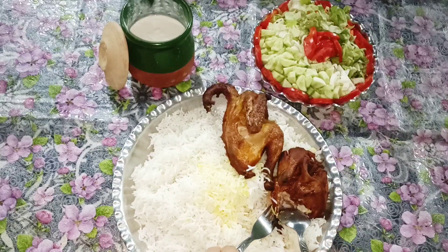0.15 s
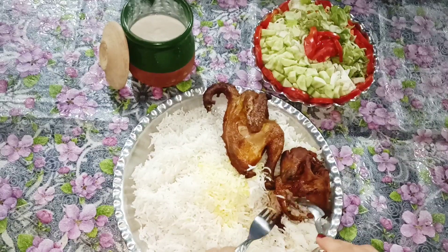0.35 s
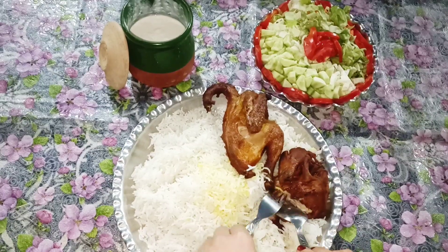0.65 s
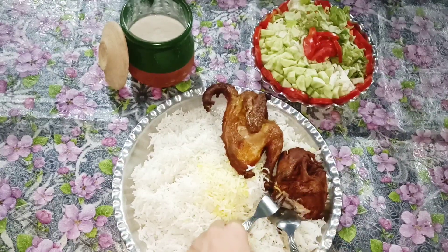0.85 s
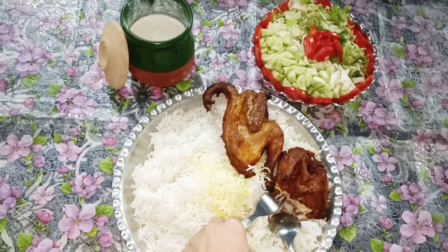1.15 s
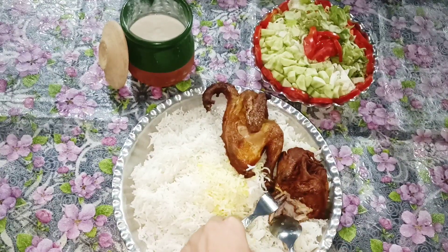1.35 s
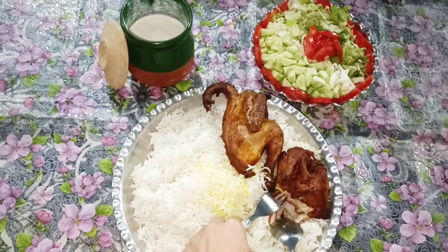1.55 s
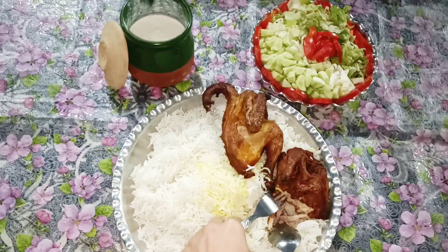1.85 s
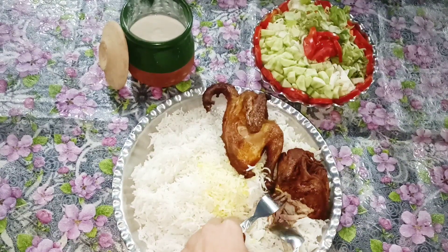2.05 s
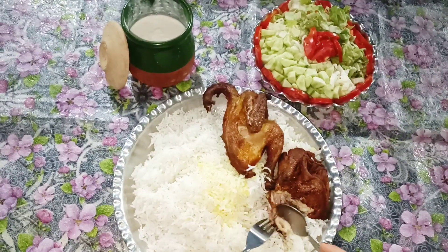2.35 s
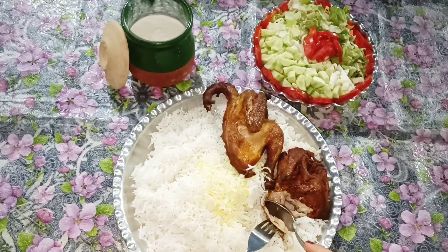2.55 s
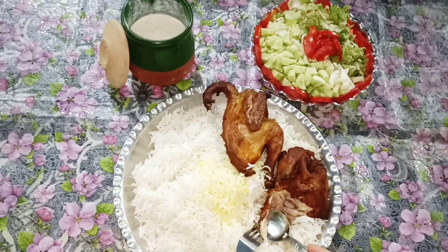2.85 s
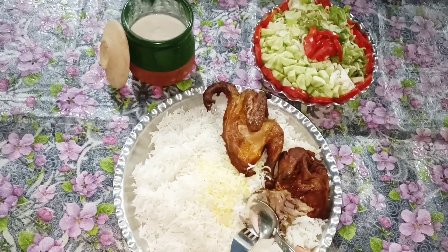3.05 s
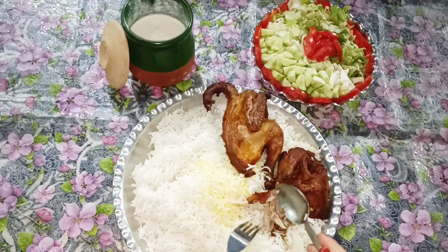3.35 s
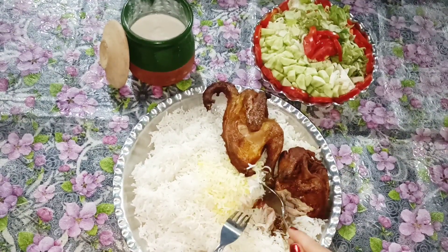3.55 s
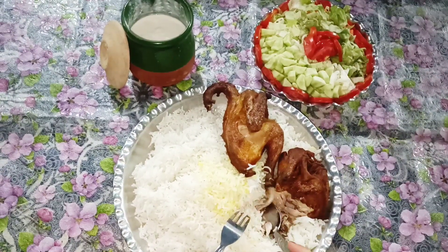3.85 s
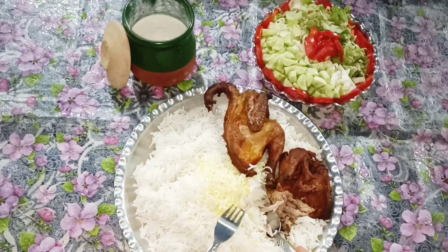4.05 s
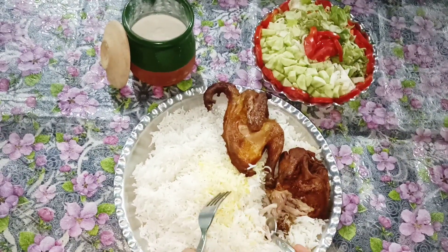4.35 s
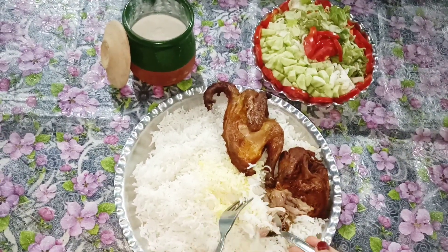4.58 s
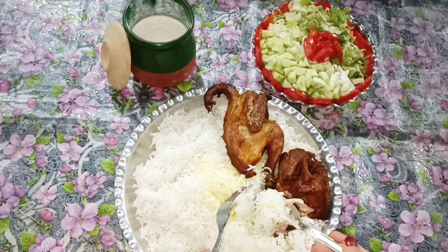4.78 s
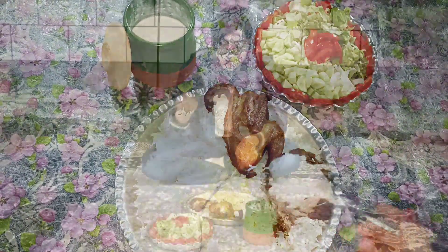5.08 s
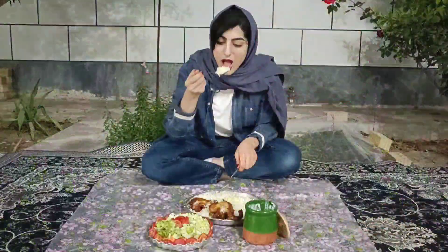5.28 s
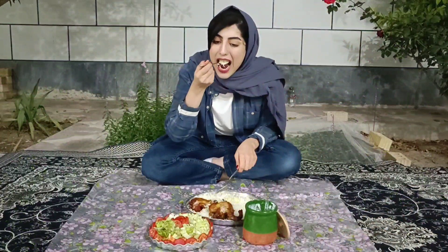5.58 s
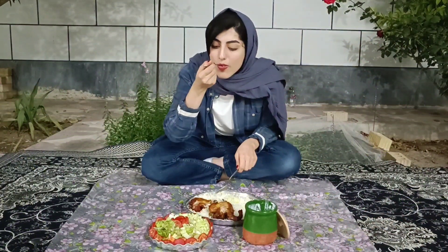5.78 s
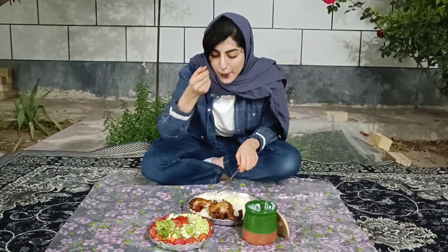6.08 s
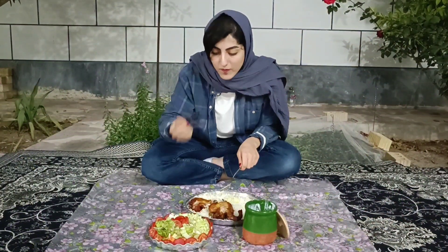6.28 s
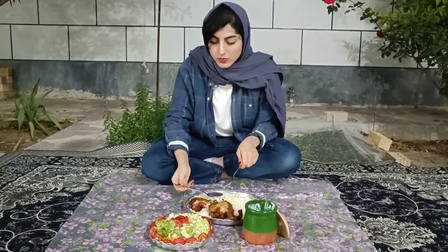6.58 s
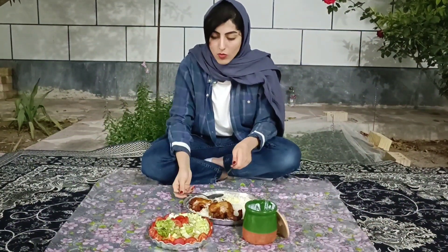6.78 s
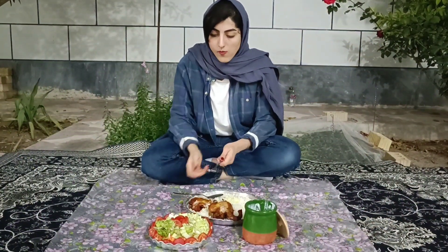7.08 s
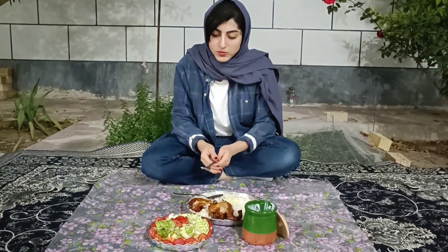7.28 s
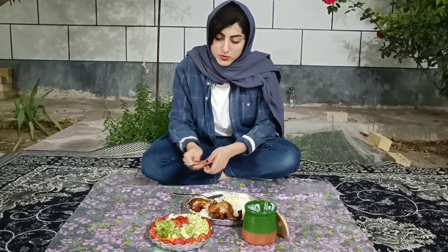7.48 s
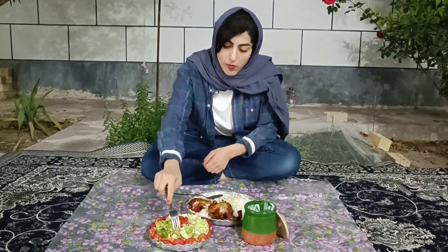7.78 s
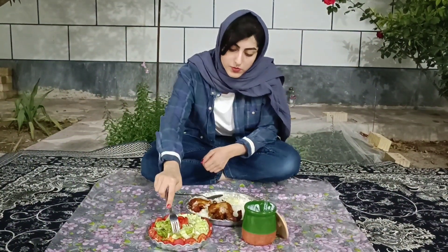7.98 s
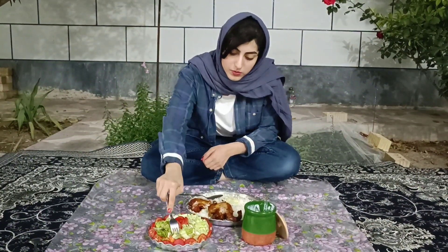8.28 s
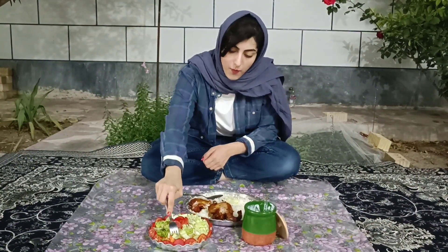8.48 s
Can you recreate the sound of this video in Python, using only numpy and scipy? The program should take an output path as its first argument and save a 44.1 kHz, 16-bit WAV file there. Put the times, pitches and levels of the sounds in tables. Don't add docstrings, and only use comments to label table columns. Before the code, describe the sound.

In a quiet walled garden with faint traffic rumble, a fork and spoon tick and scrape softly on a metal tray of rice, heard close. Distant hoarse birds chatter and a cricket trills. At about five seconds the view moves back: the cricket is gone, the air thins, birds call loudly nearby, and cutlery clicks sparsely before a sharp metal clatter near seven seconds.

```python
import sys
import numpy as np
from scipy import signal
from scipy.fft import rfft, irfft, next_fast_len
from scipy.io import wavfile
from scipy.ndimage import uniform_filter1d, map_coordinates

SR = 44100
rng = np.random.default_rng(int(sys.argv[2]) if len(sys.argv) > 2 else 0)


def decibels_to_gain(level_db):
    exponent = np.asarray(level_db, float) / 20
    return 10 ** exponent


def materialize(psi):
    bounded = np.clip(np.atleast_2d(psi).T, -1, 1)
    quanta = np.round(bounded * 32767).astype(np.int16)
    wavfile.write(sys.argv[1], SR, quanta)


N = 380538


def unit(x):
    return x / np.sqrt(np.mean(x ** 2) + 1e-20)


def along(points, hz):
    f, v = np.transpose(points)
    return np.interp(np.log(hz + 1), np.log(f + 1), v)


def wobble(rate, size=N):
    knots = rng.standard_normal(int(size * rate / SR) + 4)
    return map_coordinates(knots, [np.arange(size) * rate / SR])


def filtered(x, response):
    m = next_fast_len(x.shape[-1] + 4096)
    spectrum = rfft(x, m) * response(np.fft.rfftfreq(m, 1 / SR))
    return irfft(spectrum, m)[..., :x.shape[-1]]


def resonances(peaks, bright_db):
    def response(f):
        tilt = decibels_to_gain(bright_db * np.log2(np.clip(f, 150, 16000) / 3000))
        total = 0
        for k, (hz, width, db) in enumerate(peaks):
            peak = 1j * f * width / (hz * hz - f * f + 1j * f * width)
            total = total + (-1) ** k * decibels_to_gain(db) * peak
        return tilt * total
    return response


def add(track, s, x):
    part = track[..., round(s * SR):][..., :x.shape[-1]]
    part += x[..., :part.shape[-1]]


# pitch_hz, t60_s
YARD_DECAY = [(500, 1), (2500, 0.77), (6000, 0.47), (12000, 0.44)]


def echoes(x, t60_scale, delay_s):
    size = 2048 if t60_scale < .25 else 16384
    hz, t, z = signal.stft(rng.standard_normal((2, size)), SR, nperseg=256)
    decay = decibels_to_gain(-60 * t / (t60_scale * along(YARD_DECAY, hz)[:, None]))
    tail = signal.istft(z * decay, SR, nperseg=256)[1]
    tail = np.pad(tail / np.linalg.norm(tail[0]), ((0, 0), (int(abs(delay_s) * SR), 0)))
    return signal.fftconvolve(np.atleast_2d(x), tail, axes=1)


# pitch_hz, likeness (-1 to 1)
AIR_LIKENESS = [(60, 0.74), (180, 0.64), (550, 0.29), (1650, -0.2), (4970, 0.019), (15000, -0.11)]


def air(spectrum, db, patchy_db, size):
    z = signal.stft(rng.standard_normal((2, size)), nperseg=512)[2]
    field = rng.standard_normal(z.shape[1:])
    field = uniform_filter1d(uniform_filter1d(field, 8, 0), 14, 1)
    pair = signal.istft(z * decibels_to_gain(patchy_db * unit(field)), nperseg=512)[1][:, :size]

    def colour(hz):
        turn = np.arccos(np.clip(along(AIR_LIKENESS, hz), -1, 1)) / 2
        return decibels_to_gain(along(spectrum, hz)) * [np.cos(turn), np.sin(turn)]

    mid, side = filtered(pair, colour)
    drift_db = .35 * wobble(1.5, size=size)
    return decibels_to_gain(db + drift_db) * unit(np.array([mid + side, mid - side]))


MOVE_S = 5.075
# pitch_hz, level_db per Hz
CLOSE_AIR = [(12, -40), (20, -19.5), (65, 0.5), (116, -2.5), (234, -8.5), (499, -15), (780, -16),
             (1530, -22), (3740, -26), (6010, -26.5), (6910, -30.5), (8650, -29.5), (9950, -33),
             (14700, -34), (16000, -32)]
# pitch_hz, level_db per Hz
BACK_AIR = [(12, -77), (20, -31), (52, -12.5), (130, -7), (241, -14.5), (270, -14), (301, -15),
            (718, -20.5), (825, -20), (976, -21.5), (2020, -28), (4180, -32), (6180, -37.5), (10200, -39),
            (16000, -40.5)]


def background():
    cut = round(MOVE_S * SR)
    before = air(CLOSE_AIR, db=-58.5, patchy_db=1.5, size=cut)
    after = air(BACK_AIR, db=-58.0, patchy_db=1.1, size=N - cut)
    return np.hstack([before, after])


# pitch_hz, level_db rms
ENGINES = [(68, -70), (82, -76.5), (128, -71.5), (150, -70)]


def engines():
    t = np.arange(N) / SR

    def slow(rate):
        knots = int(t[-1] * rate) + 2
        return np.interp(t * rate, np.arange(knots), rng.standard_normal(knots))

    out = np.zeros(N)
    for hz, db in ENGINES:
        level = decibels_to_gain(db + 2.5 + 3.5 * slow(9.8))
        pitch = hz * (1 + 0.03015 * slow(3))
        out += level * np.sin(2 * np.pi * np.cumsum(pitch) / SR)
    return out


# pitch_hz, level_db
THROAT = [(500, -50), (1000, -21), (1500, -13.5), (2150, -7), (2650, 2), (3700, 2.5), (4120, 0),
          (4750, 2.5), (5400, -0.5), (5900, -4.5), (6500, -6), (7200, -13), (9300, -18.5), (12500, -30.5),
          (16000, -68)]


def squawk(length_s, hz0, hz1, bright_db, rough, hoarse):
    u = np.linspace(0, 1, int(length_s * SR))
    pitch = (hz0 + (hz1 - hz0) * u ** 1.2) * (1 + rough * wobble(351.1, size=len(u)))
    phase = 2 * np.pi * np.cumsum(pitch) / SR
    k = np.arange(1, 10)[:, None]
    flutter = np.array([wobble(600 + 250 * min(j, 3), size=len(u)) for j in k[:, 0]])
    flutter = 0.57 + 1.4 * hoarse * flutter
    lean_db = (bright_db + 14 * (.45 - u)) * (np.minimum(k, 4) - 2.5)
    stack = unit(np.sum(decibels_to_gain(lean_db) * flutter * np.sin(k * phase), axis=0))
    breath = .75 * hoarse * rng.standard_normal(len(u))
    attack = np.clip(u / 0.2, 0, 1) ** 0.71
    release = np.clip((1 - u) / .5, 0, 1) ** 0.47
    voice = filtered(stack + breath, lambda hz: decibels_to_gain(along(THROAT, hz)))
    return unit(voice) * attack * release


def birds(calls, direct_db, early_db, yard_db, treble_db, hoarse, full_db, sag, bright_db, dulls):
    out = np.zeros((2, N))
    for s, length_s, db, hz0 in calls:
        effort_db = db - full_db
        hz1 = hz0 * (1 - np.clip(sag + 0.1 * effort_db, .12, sag))
        tilt_db = bright_db + np.clip(dulls * (effort_db - 5), -1.5, 0)
        call = decibels_to_gain(db) * squawk(length_s, hz0, hz1, tilt_db, rough=0.0329, hoarse=hoarse)
        call = filtered(call, lambda hz: decibels_to_gain(treble_db * np.log2(1 + hz / 6000)))
        add(out, s, decibels_to_gain(direct_db) * call * [[1], [0]])
        add(out, s + .0006, decibels_to_gain(direct_db) * call * [[0], [1]])
        add(out, s, decibels_to_gain(early_db) * echoes(call, t60_scale=0.064, delay_s=.002))
        add(out, s, decibels_to_gain(yard_db) * echoes(call, t60_scale=0.98, delay_s=0.01))
    return out


# start_s, level_db, pitch_hz at the start
FAR_CALLS = [(.04, -77, 1650), (.25, -66, 1610), (.75, -62, 1566), (1.15, -67, 1627), (1.929, -60, 1567),
             (2.18, -63, 1600), (2.53, -64, 1605), (3.27, -69.5, 1768), (3.459, -75, 1650),
             (3.84, -59, 1580), (4.03, -60, 1608), (4.14, -61.5, 1788)]


def far_birds():
    calls = [(s, .088, db, hz) for s, db, hz in FAR_CALLS]
    return birds(calls, direct_db=-5, early_db=-1.5, yard_db=0.5, treble_db=0, hoarse=0.6,
                 full_db=-62.5, sag=.195, bright_db=-1.5, dulls=0.071)


# pitch_hz, level_db, t60_s (not used, a smooth hump shapes each stroke)
WING = [(5890, 1, .012), (6340, -1, .015)]
# start_s, period_s, chirps
BOUTS = [
    (.095, .144, 3),
    (.507, .132, 11),
    (1.97, .1375, 17),
    (4.35, .167, 5),
]


def cricket():
    out = np.zeros((2, N))
    t = np.arange(int(0.016 * SR)) / SR
    for s in [first + k * period for first, period, chirps in BOUTS for k in range(chirps)]:
        size_db = -66 + 0.5 * rng.standard_normal()
        for k in range(3):
            stroke = np.zeros(len(t))
            for hz, db, t60 in WING:
                stroke += decibels_to_gain(db) * np.sin(2 * np.pi * hz * t + rng.uniform(0, 2 * np.pi))
            stroke = decibels_to_gain(size_db + 1.8 * (k - 3.5)) * stroke * np.hanning(len(t))
            add(out, s - .03 + .016 * k, echoes(stroke, t60_scale=0.091, delay_s=0))
    return out


# pitch_hz, width_hz, level_db
LOADED_TRAY = [(148, 98, -18.5), (400, 170, -7.5), (668, 270, -2.5), (1026, 116, 6.5), (1450, 300, -0.5),
               (1935, 120, 3.5), (2540, 98, 2), (2990, 85, 6.5), (3680, 750, 0), (5900, 1350, -2),
               (8700, 2100, -5.5), (14800, 1700, -13)]
# start_s, length_s, level_db, brightness_db per
SCRAPES = [(1.653, 0.036, -65.5, 0), (2.796, 0.097, -54, 2.5), (2.825, 0.0066, -45, -6.5),
           (2.948, 0.039, -66.5, 5), (3.042, 0.057, -64.5, 4), (3.138, 0.032, -68, 4.5),
           (3.33, 0.034, -68, 2), (3.877, 0.055, -49, -3.5), (3.975, 0.026, -52.5, -4),
           (3.988, 0.03, -51, -3.5), (2.831, 0.045, -55, -18), (4.889, 0.00386, -64.5, -10.5),
           (4.986, 0.0037, -67, -3)]


def scrapes():
    out = np.zeros((2, N))
    for s, length_s, db, bright_db in SCRAPES:
        n = int(length_s * SR)
        slips = decibels_to_gain(3.5 * wobble(450, size=n))
        grit = slips * (rng.standard_normal(n) + 1.1 * rng.standard_normal((2, n)))
        pressure = np.sin(np.pi * np.linspace(0, 1, n) ** 0.41)
        grit = np.pad(grit * pressure, ((0, 0), (0, 900)))
        stroke = decibels_to_gain(db) * unit(filtered(grit, resonances(LOADED_TRAY, bright_db)))
        add(out, s, stroke)
        add(out, s, decibels_to_gain(-14) * echoes(stroke, t60_scale=.45, delay_s=.004))
    return out


def ticks(touches, steel, tilt_db, contact_s, yard_db, tail):
    out = np.zeros((2, N))
    t = np.arange(1400) / SR
    u = t / np.clip(contact_s / 4, .0001, .003)
    for s, db, pan_db in touches:
        chatter = rng.standard_normal(len(t)) + 3.6 * rng.standard_normal((2, len(t)))
        tick = filtered(chatter * u * np.exp(-u), resonances(steel, tilt_db))
        tick = decibels_to_gain(db + 5.0) * tick / np.abs(tick).max(axis=1, keepdims=True)
        add(out, s, tick * decibels_to_gain(np.clip(pan_db, -6, 6) * np.array([[.5], [-.5]])))
        add(out, s, decibels_to_gain(yard_db) * echoes(tick, t60_scale=tail, delay_s=.004))
    return out


# pitch_hz, width_hz, level_db
TINES = [(2840, 810, -9), (3930, 330, 2), (5580, 710, 2), (7480, 380, 4), (8670, 450, 5),
         (11330, 670, -11.5), (11940, 280, -4), (14100, 2400, -16)]
# start_s, peak_db, left_right_db
TRAY_TICKS = [
    (1.7809, -53, -1.5),
    (2.0994, -55, -1.5),
    (2.1207, -50, -3),
    (2.7386, -45, 1.5),
    (2.7738, -54, 6),
    (2.7945, -41, 6),
    (2.9219, -54, -.5),
]


def tray_ticks():
    return ticks(TRAY_TICKS, TINES, tilt_db=-7, contact_s=0.0026, yard_db=-6, tail=.55)


# start_s, peak_db, left_right_db
SPOON_TICKS = [(1.7904, -52, 1), (1.7998, -42.5, 3), (1.8134, -56, 1), (1.821, -32.5, -4), (1.8246, -27, 1),
               (1.839, -43, -1.5), (1.9515, -46, 1), (2.0369, -51, -6), (2.1654, -54, 0), (2.8456, -37, -3),
               (3.7799, -56, -1), (3.8832, -46, -.5)]


def spoon_ticks():
    return ticks(SPOON_TICKS, TINES, tilt_db=6.5, contact_s=0.0034, yard_db=-14, tail=0.99)


# pitch_hz, width_hz, level_db
RIM = [(2700, 170, 2.5), (3670, 160, 3), (5750, 200, 4), (7500, 460, -15), (10000, 660, -5)]
# start_s, peak_db, left_right_db
CLINKS = [
    (3.0545, -48, 0),
    (3.1338, -57, 6),
    (3.142, -49, -2),
    (3.1514, -48, 5),
]


def rim_clinks():
    return ticks(CLINKS, RIM, tilt_db=0, contact_s=0.0074, yard_db=-16, tail=.55)


# start_s, length_s, level_db, pitch_hz at the start
NEAR_CALLS = [
    (5.072, 0.14, -51.5, 1442),
    (5.195, .15, -38.5, 1844),
    (5.375, 0.11, -35, 1850),
    (7.195, 0.14, -44.5, 1737),
    (7.355, .13, -35.5, 1854),
    (7.55, 0.15, -53, 1700),
    (7.66, 0.092, -51.5, 1644),
    (7.755, .05, -47, 1725),
    (8.135, 0.14, -40.5, 1747),
    (8.355, .14, -37.5, 1825),
]


def near_birds():
    return birds(NEAR_CALLS, direct_db=-14.0, early_db=-3.5, yard_db=-6, treble_db=4.0, hoarse=1.0,
                 full_db=-44.5, sag=.28, bright_db=-0.94, dulls=1.0)


# pitch_hz, width_hz, level_db
BOWL = [(2780, 420, 5.5), (4830, 770, 1), (7900, 820, 7), (11000, 1500, 1), (14000, 2500, -10)]
# start_s, peak_db, left_right_db
FAR_TICKS = [
    (5.3704, -44, 3),
    (5.703, -35, 6),
    (5.721, -57, 0),
    (5.7428, -49, -9),
    (5.8366, -46, -2),
    (6.3245, -45.5, 4),
    (6.329, -51.5, -2),
    (6.333, -58, 2),
    (8.0506, -59, -6),
    (8.4994, -43, -3),
]


def far_ticks():
    return ticks(FAR_TICKS, BOWL, tilt_db=0, contact_s=0.0063, yard_db=-3.5, tail=1.0)


def ring(modes, bright_db, t, scatter_db):
    hz, db, t60 = np.transpose(modes)[:, :, None]
    tilt_db = bright_db * np.log2(hz / 4000) * (hz > 1200)
    level = db + tilt_db + scatter_db * rng.standard_normal((2, len(modes), 1))
    waver = .6 * np.array([wobble(120, size=len(t)) for _ in modes])
    phase = rng.uniform(0, 2 * np.pi, (len(modes), 1)) + waver
    phase = phase + 1.02 * rng.standard_normal((2, len(modes), 1))
    return np.sum(decibels_to_gain(level - 60 * t / t60) * np.sin(2 * np.pi * hz * t + phase), axis=1)


# pitch_hz, level_db, t60_s
TRAY_MODES = [(557, -8, 0.052), (1050, -9, 0.037), (1536, -14.5, 0.081), (2434, -9, 0.075),
              (2550, -5.5, 0.12), (2860, -17, 0.05), (3014, -6, 0.087), (3400, -3, 0.044),
              (3730, -2.5, 0.071), (4100, -8.5, 0.13), (4500, -1, 0.07), (5140, -5, 0.068), (5460, 1, 0.04),
              (5556, -13, .08), (6470, -3.5, 0.082), (7779, -12, 0.15), (8740, -6, 0.099),
              (9460, -16, 0.091), (9800, -16, 0.085), (10700, -13, 0.032), (13000, -27, .04),
              (14000, -29, .04)]
# pitch_hz, level_db
CLATTER = [(300, -19), (550, -11), (800, -21.5), (1600, -12.5), (2500, 0), (3400, -1), (5300, -1.5),
           (6500, -11.5), (8000, -5), (11000, -10), (13000, -23), (16000, -36)]
# start_s, peak_db, brightness_db per octave
KNOCKS = [
    (6.155, -33.5, -4),
    (6.162, -30.5, -5.5),
    (6.184, -33.5, -6.5),
    (6.204, -35.5, -9),
    (6.899, -17, -1),
    (6.908, -25, 2.5),
    (6.916, -24.5, -1.5),
    (6.94, -32.5, 13),
]


def knocks():
    out = np.zeros((2, N))
    t = np.arange(7000) / SR
    for s, db, bright_db in KNOCKS:
        def colour(hz):
            return decibels_to_gain(along(CLATTER, hz) + bright_db * np.log2((hz + 50) / 4000) * (hz > 1200))

        modes = ring(TRAY_MODES, bright_db, t, scatter_db=1.1)
        noise = rng.standard_normal(len(t)) + 1.7 * rng.standard_normal((2, len(t)))
        dense = unit(filtered(noise, colour)) * decibels_to_gain(-60 * t / 0.063)
        onset = 1 - np.exp(-t / 0.0004)
        blow = decibels_to_gain(db - 12.5) * (0.61 * modes + 1.1 * dense) * onset
        add(out, s, blow * decibels_to_gain([[1.2], [-1.2]]))
        add(out, s, decibels_to_gain(-3.0) * echoes(blow, t60_scale=0.84, delay_s=.008))
    return out


# start_s, length_s, level_db, pitch_hz at the start
THIN_CALL = [
    (6.325, .09, -61, 1890),
]


def thin_bird():
    return birds(THIN_CALL, direct_db=-15.0, early_db=-7.0, yard_db=-8.5, treble_db=10.0, hoarse=0.8,
                 full_db=-50, sag=.2, bright_db=12, dulls=0)


def scene():
    garden = background() + engines()
    creatures = far_birds() + cricket() + near_birds() + thin_bird()
    touches = tray_ticks() + spoon_ticks() + rim_clinks() + far_ticks()
    return garden + creatures + touches + scrapes() + knocks()


def roll_off(x):
    return signal.sosfilt(signal.butter(12, 16620, fs=SR, output="sos"), x)


# pitch_hz, left_right_db
PORT_COLOUR = [(60, 0.5), (180, -1), (550, -0.5), (1650, -2.5), (4970, 2), (15000, 1)]
# pitch_hz, width_hz, depth (0 to 1)
BODY_SHADOWS = [(6900, 210, 0.44), (8480, 720, 0.63)]


def record(dry):
    def response(hz):
        body = 1
        for centre, width, depth in BODY_SHADOWS:
            body = body * (1 - np.clip(depth, 0, .95) * np.exp(-((hz - centre) / width) ** 2))
        edge = np.where(hz < 15850, 1, decibels_to_gain(-26))
        return body * edge * decibels_to_gain(along(PORT_COLOUR, hz) * [[.5], [-.5]])

    return roll_off(filtered(dry, response))


dry = scene()
out = record(dry)
materialize(out)
```